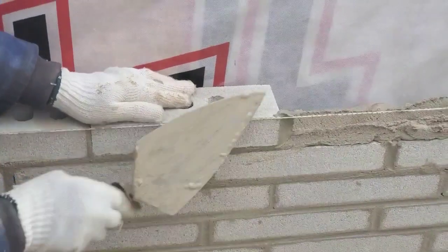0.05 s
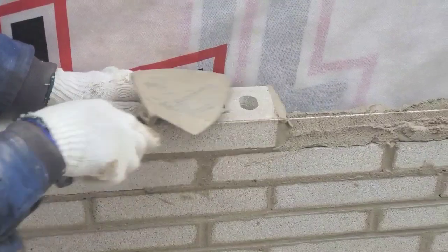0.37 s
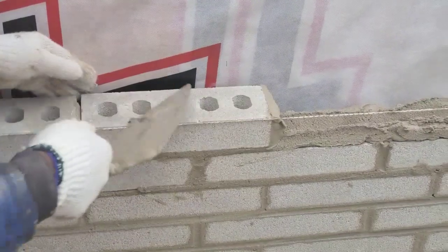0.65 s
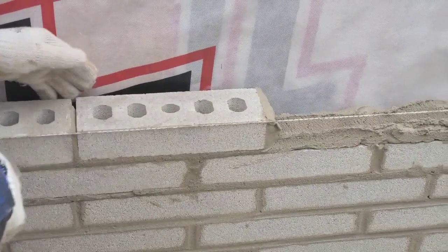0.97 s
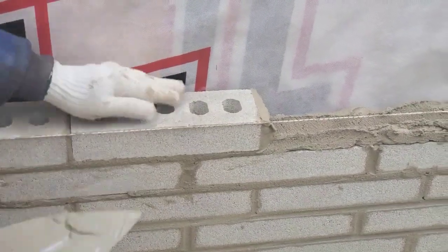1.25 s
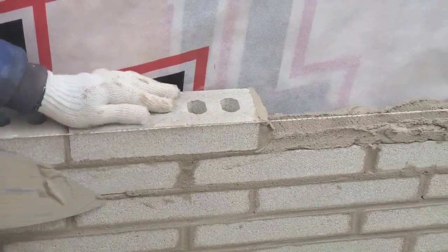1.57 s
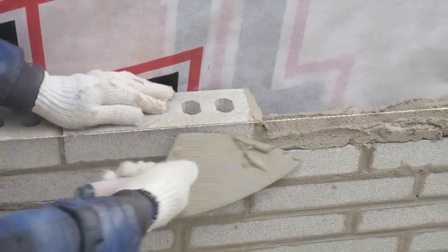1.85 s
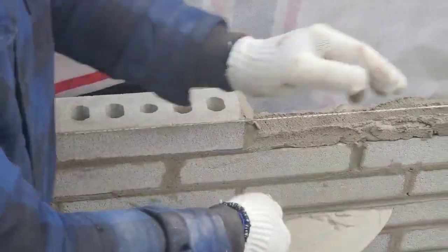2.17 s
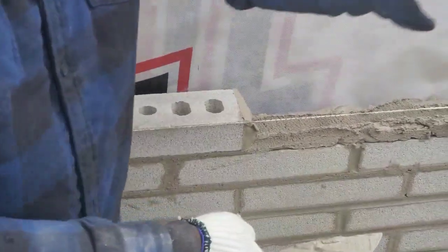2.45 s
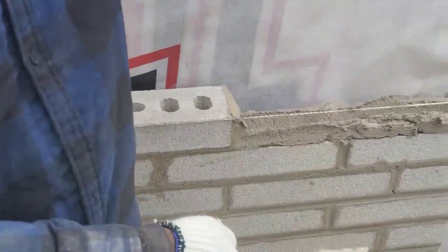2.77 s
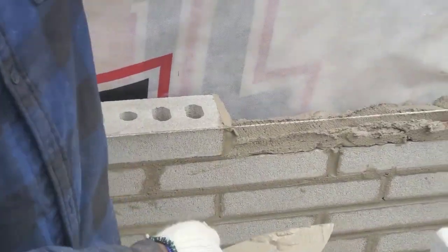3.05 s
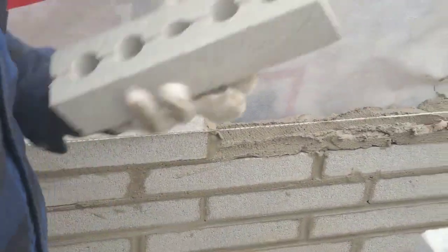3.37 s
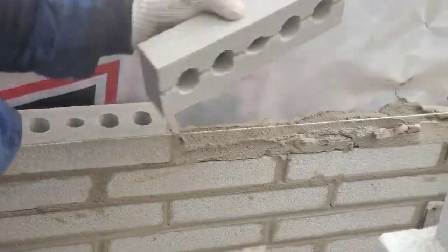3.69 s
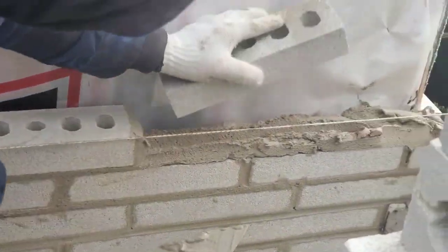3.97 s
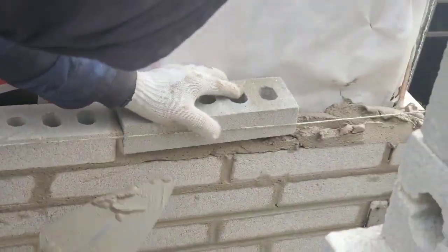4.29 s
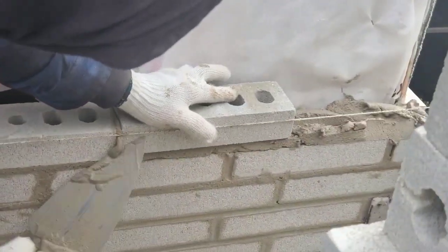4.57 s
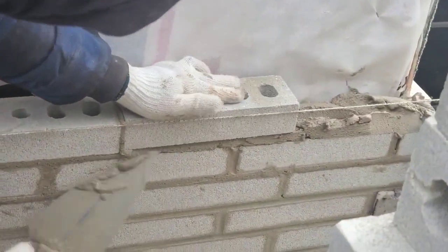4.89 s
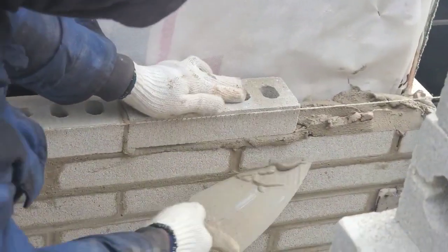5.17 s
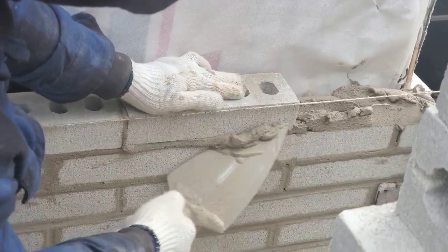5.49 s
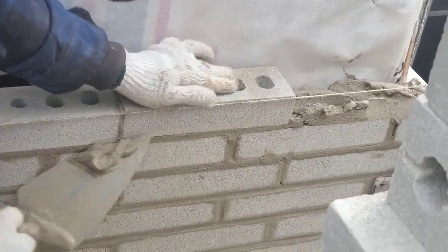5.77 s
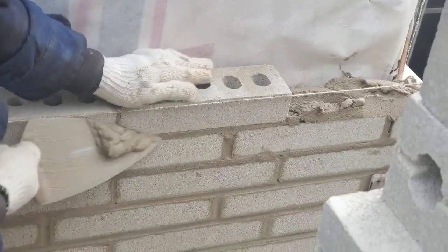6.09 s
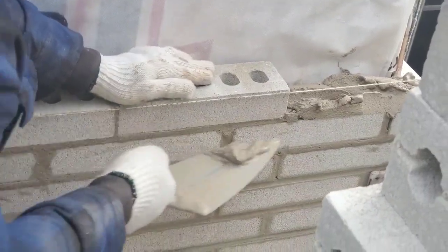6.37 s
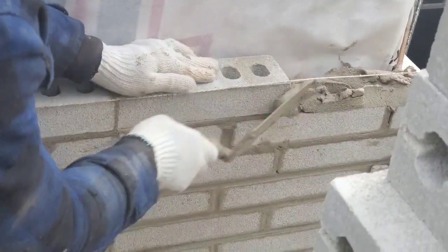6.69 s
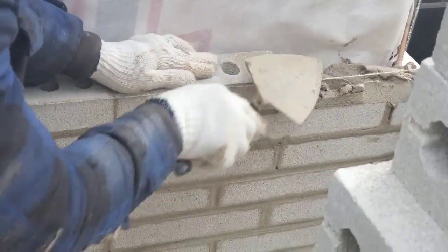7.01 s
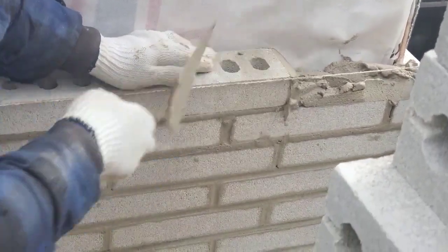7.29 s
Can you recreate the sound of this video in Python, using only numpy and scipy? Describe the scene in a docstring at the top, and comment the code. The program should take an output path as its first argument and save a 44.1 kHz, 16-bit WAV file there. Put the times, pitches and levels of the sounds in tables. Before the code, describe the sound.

A steel trowel taps and scrapes wet mortar along a brick wall in short gritty strokes, the blade ringing briefly as it lifts. Sleeves swish, then a jacket rubs and bumps against the microphone with a loud rumble and a thin squeak. Softer knocks follow as a brick is bedded, then more taps and scrapes, with one brief dropout. A far engine surges under the low rush of an open building site.

```python
"""Laying a brick with a trowel

A steel trowel taps and scrapes along a wall, beds a brick in wet mortar and cleans off the joint.
Sand grains rasp under the blade, which rings as it lifts. Work clothes rustle and once rub over
a camera's case. An engine labours far off on the open site. The sound cuts out once, briefly."""
import sys
import numpy as np
from scipy import signal
from scipy.fft import rfft, irfft, next_fast_len
from scipy.io import wavfile
from scipy.ndimage import uniform_filter1d, map_coordinates

SR = 44100
rng = np.random.default_rng(int(sys.argv[2]) if len(sys.argv) > 2 else 0)


def materialize(psi):
    """Save the field psi as 16-bit PCM at rate SR to the path in sys.argv[1].

    A 1-D psi becomes a single channel; in a 2-D psi each row is a channel.
    """
    bounded = np.clip(np.atleast_2d(psi).T, -1, 1)
    quanta = np.round(bounded * 32767).astype(np.int16)
    wavfile.write(sys.argv[1], SR, quanta)


N = 332514
TIME = np.arange(N) / SR
SIZE = 2 * next_fast_len(N // 2 + SR // 2)  # samples used for filtering, with room for tails
HZ = np.fft.rfftfreq(SIZE, 1 / SR)

# how alike both ears hear the work at the wall: (frequency [Hz], likeness [1 or more = identical])
WALL_LIKENESS = [(300, 1.1), (800, 0.75), (1400, 0.63), (2400, 0.48), (4400, 0), (12000, 0)]


def trowel():
    """Scrapes and taps make the blade ring, the brick rasp and the grit hiss."""
    # ringing tones of the blade pressed on brick: (pitch [Hz], width [Hz], level [dB])
    blade_modes = [(1155, 46, -4), (1267.6, 27, 2), (1362, 35, -5.5), (1449, 42, 0), (1656, 36, -2.5),
                   (1778, 32, 1), (1860, 39, -4.5), (1992, 22, 1), (2082, 30, -2.5), (2160, 36, -0.5),
                   (2436, 31, -4), (2565, 28, 0.5), (2622, 20, 0.5), (3140, 40, -7), (3700, 50, -12)]
    # low, hollow tones of the blade and the brick with its holes: (pitch [Hz], width [Hz], level [dB])
    hollow_modes = [(454, 63, -4.5), (539.5, 35, 0.5), (652, 66, -1), (749, 36, -3), (859, 31, -1.5),
                    (981, 26, -3.5), (1049, 50, -10)]
    # the brick's dull rasp: (frequency [Hz], level [dB])
    brick_spectrum = [(500, -38.5), (900, -17), (1250, -5), (1550, -8), (2000, -1), (2600, -8.5),
                      (3200, -9.5), (5000, -44.5), (9000, -77)]
    # the bright spray of grit: (frequency [Hz], level [dB])
    grit_spectrum = [(1200, -45), (2400, -13), (3300, -2.5), (4300, -2.5), (5100, 0.5), (5900, 0),
                     (6800, -1), (8000, -3.5), (11000, -4), (14000, -6.5), (16000, -15)]
    # which side is louder: (frequency [Hz], left minus right [dB])
    balance = [(500, 0), (1000, -0.3), (2200, -2), (4400, 1), (12000, 1.5)]
    scrape, scrape_grit, scrape_hollow, scrape_contacts = scrapes()
    knock, tap_grit, thud, tap_contacts = taps()
    # where the edge touches decides which pitch rings most (the focus); it wanders while sliding
    focus = np.interp(TIME, *np.transpose(sorted(scrape_contacts + tap_contacts)))
    sliding = scrape / (scrape + knock + 1e-9)
    focus *= 2 ** (.14 * sliding * wobble(18))
    steel_force = (scrape + knock * amp(-7)) * noise(WALL_LIKENESS)
    steel = ringing(steel_force, blade_modes, focus, falloff_db=9, sway_db=4.5)
    hollow_force = (scrape_hollow + thud) * noise(WALL_LIKENESS)
    hollow = ringing(hollow_force, hollow_modes, focus, falloff_db=14, sway_db=6)
    tones = flexing(steel + hollow, bend_s=.0009)
    brick_force = (scrape * amp(-7.5) + knock) * noise(WALL_LIKENESS)
    brick = filtered(brick_force, colour(brick_spectrum, ripple_db=4))
    grit_force = (scrape_grit + tap_grit) * noise(WALL_LIKENESS)
    spray = filtered(grit_force, colour(grit_spectrum, ripple_db=2.4))
    rasp = blade_echo(brick + spray, delay_s=.0006, swing=.2, share=.2)
    return filtered(tones + rasp, amp(np.outer([1, -1], along(balance)) / 2))


def scrapes(octaves_per_db=.035):
    """Sand catches under the edge. Gives three force curves and the (time, pitch) of the contacts."""
    # trowel strokes: (start [s], push [s], ease [s], swell [dB], sag [dB],
    # blade [dB], grit [dB], hollow [dB], favoured pitch at the hardest push [Hz])
    strokes = [ (0.066, .048, .004, 9, 1, -30.5, -20, -38, 1400),
               (0.535, .128, .07, 18, 8, -15, -16, -20, 2000),
               (1.2, .215, .222, 11, 6.5, -24, -26.5, -29, 1850),
               (3.13, .03, .022, 17, 12, -32.5, -37, -40, 1450),
               (4.326, .058, .1, 13, 24, -31.5, -39, -38.5, 1900),
               (5.12, .22, .135, 15, 2, -34.5, -36, -36.5, 2100),
               (5.835, .11, .044, 20, 6, -26, -35.5, -31, 1800),
               (6.604, .033, .01, 13, 6.5, -34, -38.5, -41, 1800),
               (6.956, .052, .006, 9, 3.5, -31, -24.5, -37, 1350),
               (7.365, 0.22, .02, 9, -2, -23.5, -27, -27.5, 1450), ]
    sand = friction(grain_rate=1500, grain_db=2.4, catch_rate=140, catch_db=1.8)
    blade, grit, hollow = np.zeros((3, N))
    contacts = []
    for start, push, ease, swell_db, sag_db, blade_db, grit_db, hollow_db, hz in strokes:
        rubbing = pressure(start, push, ease, swell_db, sag_db) * sand
        blade += amp(blade_db) * rubbing
        grit += amp(grit_db) * rubbing
        hollow += amp(hollow_db) * rubbing
        # a lighter touch favours lower tones
        for at, lighter_db in [(start, swell_db), (start + push, 0), (start + push + ease, sag_db)]:
            contacts.append((at, hz * 2 ** (-octaves_per_db * lighter_db)))
    return blade, grit, hollow, contacts


def taps(contact_s=.0057, dwell_s=.011, thud_hz=1300):
    """Steel hits brick, then crunches briefly. Gives three force curves and the contacts."""
    # taps: (time [s], knock [dB], grit [dB], favoured pitch [Hz], time for the crunch to fade 60 dB [s])
    hits = [ (0.04, -27, -22.5, 480, .03), (0.0567, -31, -16, 1900, .026), (0.4904, -25, -19, 1684, 0.039),
            (0.5096, -31, -28, 1780, 0.063), (0.5367, -33, -29, 1050, .06), (1.1488, -24, -26, 1100, .09),
            (1.275, -28, -44, 1400, 0.037), (1.414, -20, -31, 1600, .06), (1.7776, -47, -53, 1100, .05),
            (3.5988, -47, -54, 500, .03), (3.866, -50, -56, 1900, .025), (4.146, -42, -46, 2070, 0.06),
            (4.2642, -45, -70, 750, .05), (4.324, -37, -44, 1916, .04), (4.6859, -46, -52, 1400, .11),
            (5.0595, -29.5, -47, 1200, .055), (5.122, -45, -47, 2010, 0.033), (5.432, -37, -36, 1406, .04),
            (5.469, -28, -33, 2250, .055), (5.6408, -34, -35, 2000, 0.063), (5.8169, -40, -42, 1150, .07),
            (5.9, -27, -41, 1700, 0.071), (6.2343, -46, -53, 1600, .045), (6.5076, -39, -32, 1732, .11),
            (6.558, -20, -28, 1450, .028), (6.5729, -39, -24.5, 1460, 0.049), (6.603, -46, -33, 1808, .04),
            (6.9542, -27.5, -41, 1100, .055), (7.1436, -41, -51, 1800, 0.073), (7.327, -45, -43, 750, 0.12),
            (7.3521, -23, -29, 720, .055), (7.519, -25, -39, 2000, .1)]
    times, knock_db, grit_db, hz, fade_s = np.transpose(hits)
    instant = np.full(len(times), contact_s)
    knock = blows(times, knock_db, fade_s) + blows(times, knock_db, instant)
    grit = blows(times, grit_db, fade_s) + blows(times, grit_db - 8, instant)
    thud = blows(times, knock_db + 7 * np.log2(thud_hz / hz), fade_s)  # lower taps thud more
    contacts = list(zip(times, hz)) + list(zip(times + dwell_s, hz))  # each stays briefly on one spot
    return knock, grit, thud, contacts


def flexing(sound, bend_s):
    """Changing pressure bends the steel, so its pitches glide a little."""
    clock = TIME + bend_s * np.clip(wobble(7), -2, 2)
    return np.array([np.interp(clock, TIME, side) for side in sound])


def blade_echo(sound, delay_s, swing, share):
    """A copy bounces off the tilting blade; its changing delay sweeps the tone of the rasp."""
    delay = delay_s * np.exp(swing * wobble(6))
    echo = np.array([map_coordinates(side, [(TIME - delay) * SR], order=3) for side in sound])
    return (sound + share * echo) / np.hypot(1, share)


def blade_ring(attack_s=.0022):
    """Lifted off the wall that damped it, the blade rings on in three tones."""
    # tones of the free blade: (pitch [Hz], time to fade 60 dB [s])
    free_modes = [(990, 0.15), (1254, 0.21), (1445, 0.13)]
    # the blade springs clear: (time [s], first tone [dB], second tone [dB], third tone [dB])
    lifts = [(0.118, -46, -20, -26), (0.732, -32.5, -59, -14), (1.158, -23, -62, -55),
             (1.635, -26, -55, -48)]
    ring = np.zeros(N + SR)
    t = np.arange(SR // 2) / SR
    attack = 1 - np.exp(-t / attack_s)
    for start, *levels in lifts:
        for db, (hz, fade_s) in zip(levels, free_modes):
            tone = amp(db - 60 * t / fade_s) * np.sin(2 * np.pi * hz * t)
            ring[round(start * SR):][:len(t)] += attack * tone
    return ring[:N] * amp([[-1.5], [1.5]])  # a little to the right


def camera_rub(body_hz=165, click_s=.034, drag_hz=2550, hard_bump_hz=5000):
    """The jacket drags over the camera: its body rumbles, its openings scuff and its case rings."""
    # drags: (start [s], push [s], ease [s], swell [dB], sag [dB], rumble [dB], scuff [dB], ring [dB])
    drags = [(2.466, .094, .065, 23, 6, -20, -26, -31), (2.621, .155, .02, 9, 1, -18.5, -20.5, -23.5),
             (2.824, .01, .022, 1, 14, -18.5, -29, -26)]
    # bumps on the camera: (time [s], thump [dB], scuff [dB], ring [dB], time to fade 60 dB [s])
    bumps = [(2.523, -24, -33, -20, .03), (2.545, -16, -27, -22, .04), (2.566, -13, -23.5, -43, 0.023),
             (2.785, -20, -17, -16, .03), (2.812, -12, -12, -7, .08), (2.926, -16, -22, -39, .105)]
    # ringing tones of the case: (pitch [Hz], width [Hz], level [dB])
    case_modes = [(2333, 50, 3), (2840, 34, 0), (3230, 85, -7), (5426, 31, -3), (5600, 34, -4),
                  (6310, 49, -6), (9140, 70, -8), (12100, 150, -7.5)]
    # the body's low rumble: (frequency [Hz], level [dB])
    body_spectrum = [(50, -41), (95, -14.5), (135, -3), (168, 4.5), (205, -3.5), (240, -2), (310, -22.5),
                     (600, -48.5)]
    # cloth brushing the openings: (frequency [Hz], level [dB])
    scuff_spectrum = [(150, -22), (330, -1.5), (530, 2), (760, -4.5), (1050, -5), (1400, -7.5),
                      (1900, -9.5), (4000, -33), (9000, -30), (16000, -33)]
    times, thump_db, knock_db, click_db, fade_s = np.transpose(bumps)
    rumble, ring = np.zeros((2, N))
    scuff = blows(times, knock_db, fade_s)
    cloth = friction(grain_rate=630, grain_db=.5, catch_rate=90, catch_db=2)
    for *movement, rumble_db, scuff_db, ring_db in drags:
        rubbing = pressure(*movement) * cloth
        rumble += amp(rumble_db) * rubbing
        scuff += amp(scuff_db) * rubbing
        ring += amp(ring_db) * rubbing
    thumps = blows(times, thump_db, fade_s) * np.sin(2 * np.pi * body_hz * TIME)
    body = filtered(rumble * noise([(170, .97)]), colour(body_spectrum))
    body += uniform_filter1d(thumps, size=40)
    scuff_noise = noise([(300, .3), (640, .39), (1400, -.45), (3000, -.12)])
    openings = filtered(scuff * scuff_noise, colour(scuff_spectrum, ripple_db=3))
    # the harder a bump, the higher the tones it favours
    clicks = blows(times, click_db, np.full(len(times), click_s))
    hardness = np.minimum(clicks / amp(-7), 1)
    focus = drag_hz + (hard_bump_hz - drag_hz) * hardness
    case = ringing((ring + clicks) * noise([(3000, .15)]), case_modes, focus, falloff_db=6, sway_db=4)
    case += squeal(width_hz=190)
    return body + openings * amp([[-1.2], [1.2]]) + case * amp([[-2.2], [1.8]])


def squeal(width_hz, edge_s=.005):
    """Cloth sticks and slips on the case in a thin, rough tone that slides up and back."""
    # the path of the squeal: (time [s], pitch [Hz], level [dB])
    glide = [(2.57, 3000, -41), (2.60, 3170, -28), (2.65, 3250, -34), (2.69, 3250, -23.5),
             (2.73, 3330, -29.5), (2.77, 3420, -44), (2.82, 3230, -35), (2.86, 3240, -29.5),
             (2.88, 3200, -51)]
    times, hz, db = np.transpose(glide)
    phase = 2 * np.pi * np.cumsum(np.interp(TIME, times, hz)) / SR
    gate = np.clip(np.minimum(TIME - times[0], times[-1] - TIME) / edge_s + 1, 0, 1)
    tone = [wobble(width_hz) * np.cos(phase) + wobble(width_hz) * np.sin(phase) for _ in range(2)]
    return amp(np.interp(TIME, times, db)) * gate * np.array(tone)


def clothes():
    """Sleeves and gloves swish as the arms move; the padded jacket sounds duller as the body turns."""
    # swishes of sleeves and gloves: (fastest moment [s], level [dB], rise [s], fall [s])
    arm_moves = [ (0.03, -41, .1, 0.056), (0.3, -41, .2, .1), (0.84, -47, .25, .16), (0.97, -46, .07, .055),
                 (1.735, -51, .055, .08), (2.17, -62, .1, .17), (2.335, -43, 0.023, .045),
                 (2.39, -46, 0.017, 0.039), (2.9, -42, 0.13, .2), (3.24, -47, 0.13, .075),
                 (3.45, -50, .11, .19), (3.61, -56, 0.053, .07), (3.79, -53, .07, .14),
                 (4.15, -47, .36, 0.22), (4.51, -48, .06, .05), (4.58, -59, 0.12, .13),
                 (4.82, -65, .14, .17), (5.71, -43.5, 0.054, .11), (6.04, -59.5, .05, .16),
                 (6.935, -44, .085, 0.059), (7.04, -44, .04, 0.056), (7.165, -47, 0.037, .1)]
    # one turn of the body: (fastest moment [s], level [dB], rise [s], fall [s])
    body_turn = (2, -49.5, 0.14, 0.4)
    # the bright hiss of cloth: (frequency [Hz], level [dB])
    cloth_spectrum = [(880, -39.5), (1500, -3), (2160, -2.5), (3180, -4.5), (4870, -2.5), (8740, -6.5),
                      (11800, -6.5), (16000, -11.5)]
    # the dull brush of padding: (frequency [Hz], level [dB])
    padding_spectrum = [(150, -2), (450, 0.5), (1000, -8), (2000, -6), (3600, -13), (4800, -24.5),
                        (10000, -44)]
    stir = amp(-84 + 3 * wobble(5))  # clothes are never quite still
    motion = stir + sum(swish(*move) for move in arm_moves)
    weave = friction(grain_rate=810, grain_db=1.5, catch_rate=26, catch_db=2)
    sleeves = filtered(motion * weave * noise(WALL_LIKENESS), colour(cloth_spectrum))
    jacket = filtered(swish(*body_turn) * weave * noise(WALL_LIKENESS), colour(padding_spectrum))
    return sleeves + jacket


def swish(peak_s, db, rise, fall):
    """Gain of cloth that speeds up and slows down; it is 21 dB lower at the ends of rise and fall."""
    away = np.maximum((peak_s - TIME) / rise, (TIME - peak_s) / fall)
    return amp(db - 21 * np.minimum(away, 10) ** 1.9)


def engine(idle_hz=46.2, surge_hz=4.9):
    """A far engine fires faster in regular surges and settles back towards idle after each."""
    # the engine's tones: (multiple of the firing rate, level [dB])
    harmonics = [(1, -43), (3, -53), (5, -59.5), (6, -65), (7, -65), (9, -61)]
    first_s, every_s, run_up_s, settle_s = .645, 1.465, .15, .22
    since = (TIME - first_s) % every_s
    surge = np.minimum(since / run_up_s, 1) * np.exp(-np.maximum(since - run_up_s, 0) / settle_s)
    phase = 2 * np.pi * np.cumsum(idle_hz + surge_hz * surge) / SR
    tones = sum(amp(db + wobble(4)) * np.sin(round(k) * phase + .33 * wobble(5)) for k, db in harmonics)
    return np.sqrt(2) * tones


def motor(hz=84.5, level_db=-49.5):
    """A motor hums on one slightly wavering note."""
    gain = np.sqrt(2) * amp(level_db + 1.1 * wobble(1))
    return gain * np.sin(2 * np.pi * hz * TIME + .47 * wobble(3.3))


def open_air(level_db=-43):
    """The open site gives a low rush that gently swells and fades."""
    # the rush of the air: (frequency [Hz], level [dB])
    air_spectrum = [(15, -20.5), (25, -13), (40, -5.5), (65, -1.5), (110, -2), (160, -7), (200, -12.5),
                    (400, -14), (600, -16), (950, -24), (2260, -27), (3000, -36.5), (4400, -39.5),
                    (8000, -50.5), (16000, -54)]
    # how alike both ears hear it: (frequency [Hz], likeness [1 = identical])
    air_likeness = [(60, 0.91), (160, 0.95), (400, 0.46), (1000, 0.1), (4000, 0.092)]
    air = filtered(noise(air_likeness), colour(air_spectrum))
    return amp(level_db + 1.83 * wobble(2.487)) * air


def ringing(force, modes, focus, falloff_db, sway_db):
    """An object rings at its own pitches (modes); each sways in level and is weaker far from the focus."""
    gains = np.array([amp(db - falloff_db * np.abs(np.log2(hz / focus)) + sway_db * wobble(16))
                      for hz, _, db in modes])
    gains /= np.linalg.norm(gains, axis=0)
    sound = np.zeros((2, N))
    for k, ((hz, width, _), gain) in enumerate(zip(modes, gains)):
        b, a = signal.iirpeak(hz, hz / width, SR)
        sound += (-1) ** k * np.sqrt(SR / (np.pi * width)) * signal.lfilter(b, a, force * gain)
    return sound


def pressure(start, push, ease, swell_db, sag_db, bite_s=.008, release_db_per_s=1100):
    """Gain of one rubbing movement: it bites, swells with the push, sags and lets go."""
    t = TIME - start
    rising = np.clip(1 - t / push, 0, 1) ** 1.7
    easing = np.clip((t - push) / ease, 0, 1) ** 1.7
    released_s = np.maximum(t - push - ease, 0)
    level_db = -swell_db * rising - sag_db * easing - release_db_per_s * released_s
    return np.clip(t / bite_s, 0, 1) * amp(level_db)


def friction(grain_rate, grain_db, catch_rate, catch_db):
    """Uneven rubbing: quick single grains, bunched by slower catches (rates are per second)."""
    return unit(amp(grain_db * wobble(grain_rate) + catch_db * wobble(catch_rate)))


def blows(times, levels_db, fades_s):
    """Gain that jumps at each blow and drops 60 dB over its fade time."""
    gain = np.zeros(N + SR)
    t = np.arange(SR // 4) / SR
    for start, db, fade_s in zip(times, levels_db, fades_s):
        gain[round(start * SR):][:len(t)] += amp(db - 60 * t / fade_s)
    return gain[:N]


def noise(likeness):
    """White stereo noise; (frequency, likeness) points say how alike left and right are."""
    angle = np.arccos(np.clip(along(likeness), -1, 1)) / 2
    mid, side = filtered(rng.standard_normal((2, N)), np.array([np.cos(angle), np.sin(angle)]))
    return np.array([mid + side, mid - side])


def colour(spectrum, ripple_db=0):
    """A filter shape that keeps white noise equally strong; ripple stands for many small resonances."""
    ripple = np.interp(HZ, np.arange(0, SR, 60), rng.standard_normal(SR // 60))
    cepstrum = irfft(np.log(amp(along(spectrum) + ripple_db * ripple)))
    # folding this onto its first half makes the filter ring after a hit, never before
    cepstrum[1:SIZE // 2] *= 2
    cepstrum[SIZE // 2 + 1:] = 0
    return unit(np.exp(rfft(cepstrum)))


def filtered(sound, response):
    """Turn each frequency of a sound up or down by the response."""
    return irfft(rfft(sound, SIZE) * response, SIZE)[..., :N]


def along(points):
    """Join (frequency, value) points into a curve on a log frequency scale."""
    hz, values = np.transpose(points)
    return np.interp(np.log(HZ + 1), np.log(hz + 1), values)


def wobble(rate):
    """A smooth curve through `rate` random values a second."""
    return map_coordinates(rng.standard_normal(int(N * rate / SR) + 4), [TIME * rate], order=2)


def unit(x):
    """Scale to an average power of 1."""
    return x / np.sqrt(np.mean(np.abs(x) ** 2) + 1e-20)


def amp(db):
    """Turn decibels into a gain."""
    return 10 ** (np.asarray(db) / 20)


def scene():
    """The work at the wall, the rub on the camera and the site behind."""
    return trowel() + blade_ring() + clothes() + camera_rub() + engine() + motor() + open_air()


def record(dry):
    """The sound cuts out for a moment, and the very highest treble is removed."""
    # the silent gap: (start [s], end [s])
    gap = (5.474, 5.636)
    top_hz = 16000
    audible = (TIME < gap[0]) | (TIME > gap[1])
    gate = uniform_filter1d(audible.astype(float), size=64)
    return filtered(dry * gate, 1 / (1 + (HZ / top_hz) ** 120))


dry = scene()
out = record(dry)
materialize(out)
```